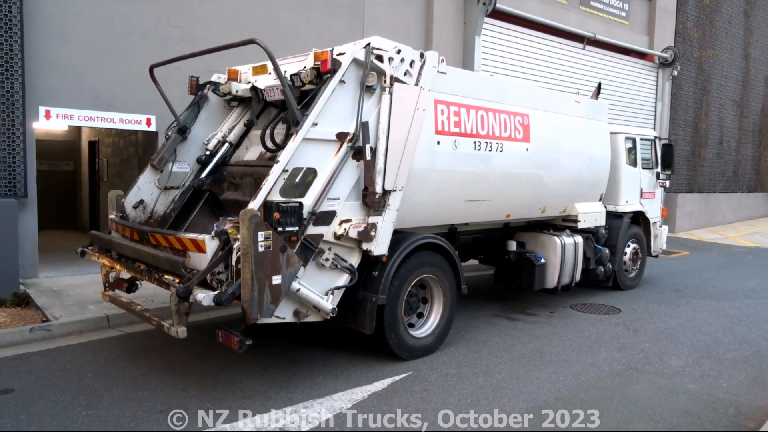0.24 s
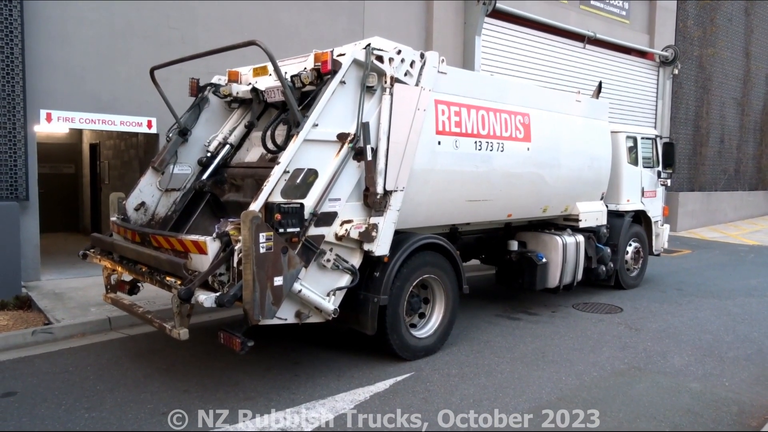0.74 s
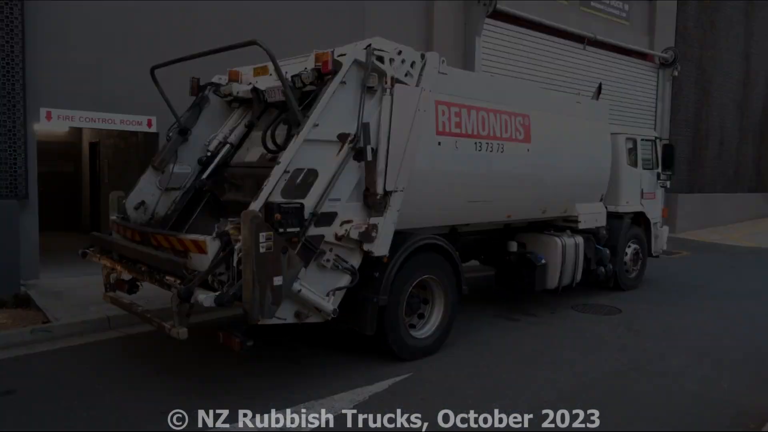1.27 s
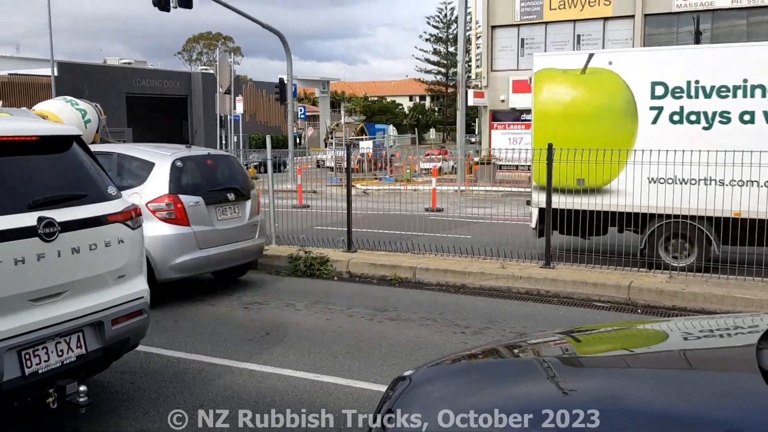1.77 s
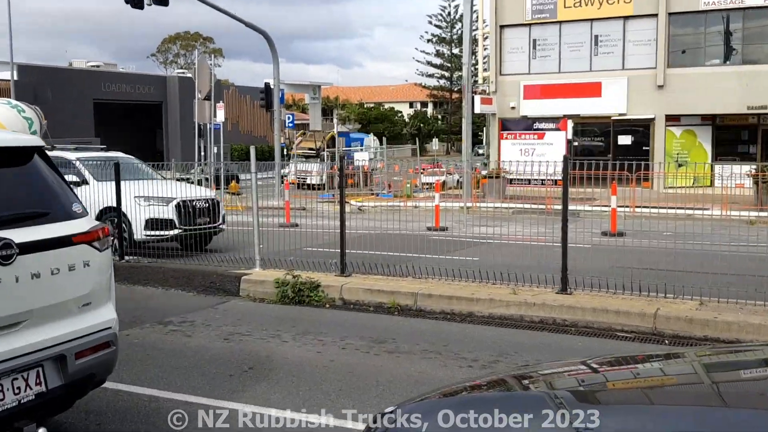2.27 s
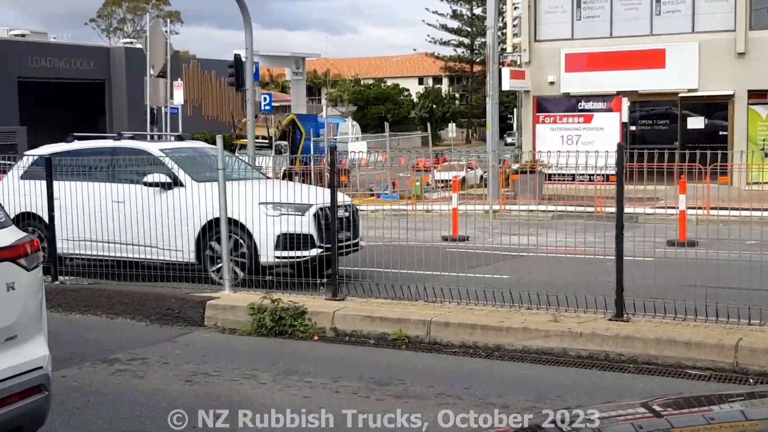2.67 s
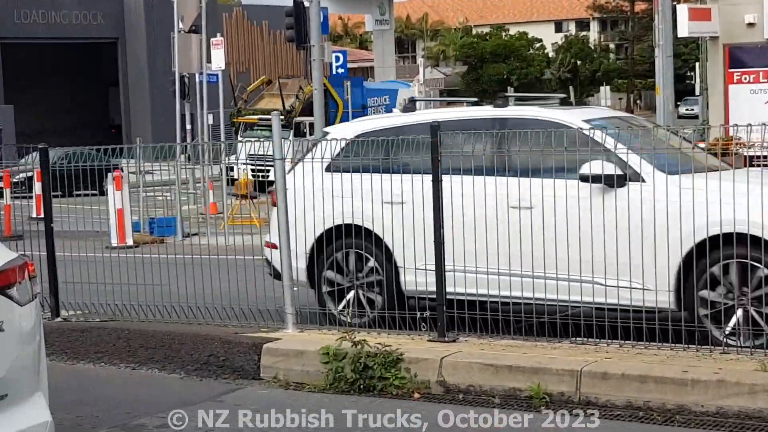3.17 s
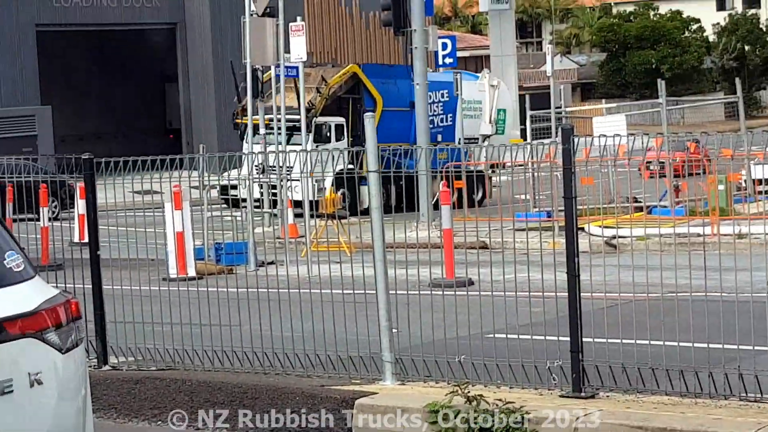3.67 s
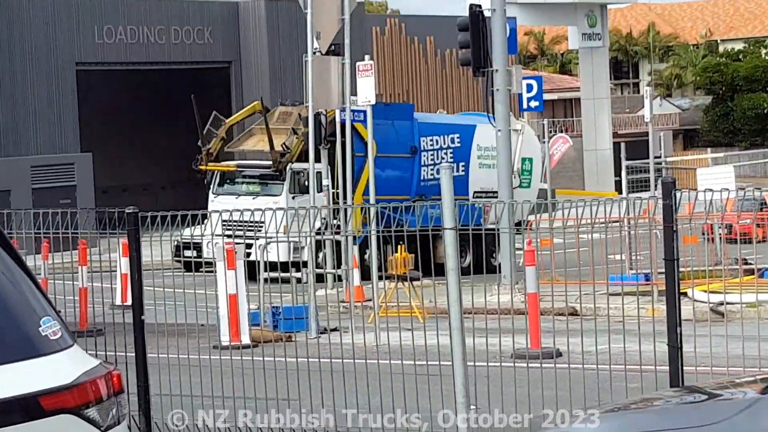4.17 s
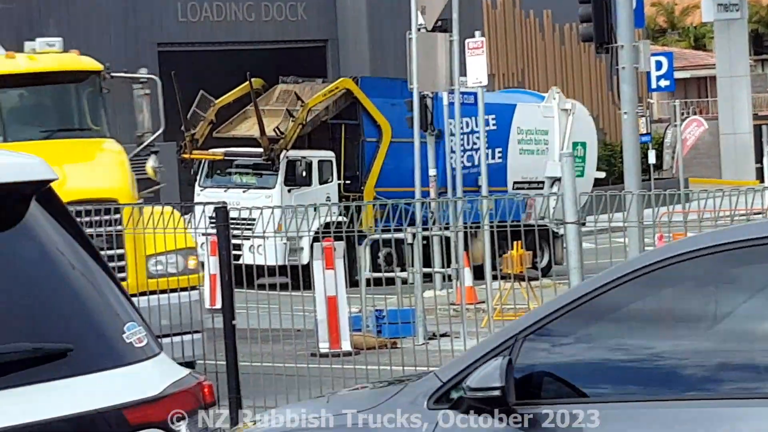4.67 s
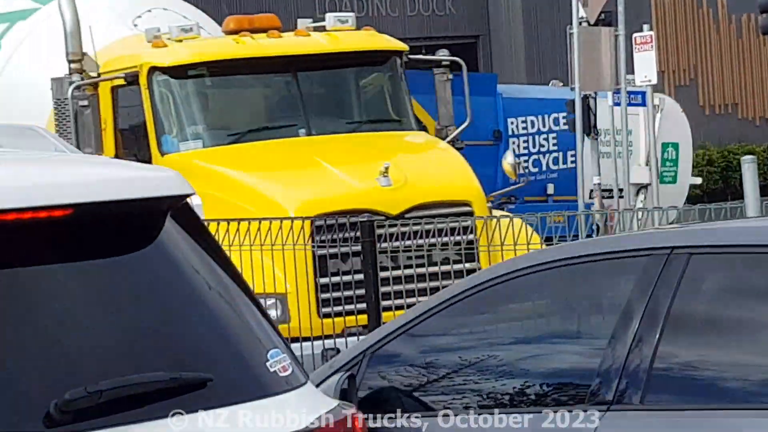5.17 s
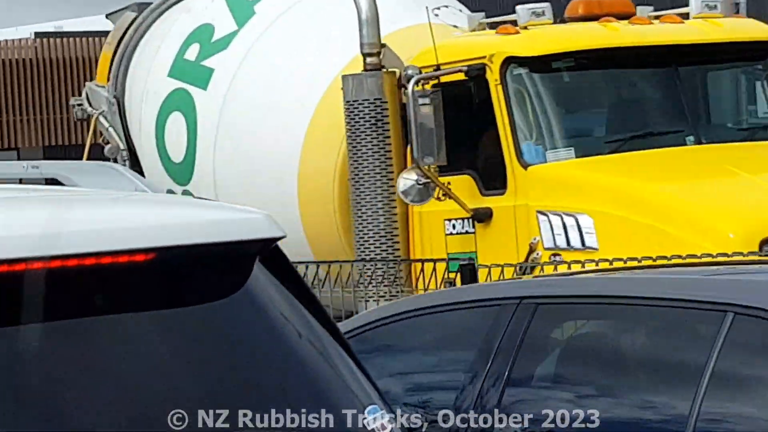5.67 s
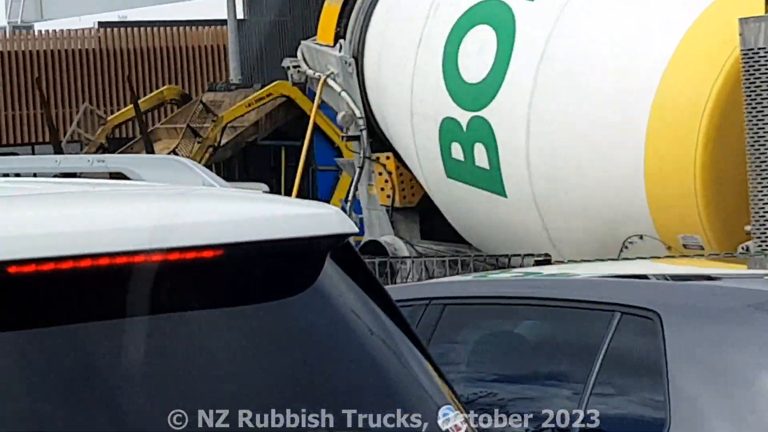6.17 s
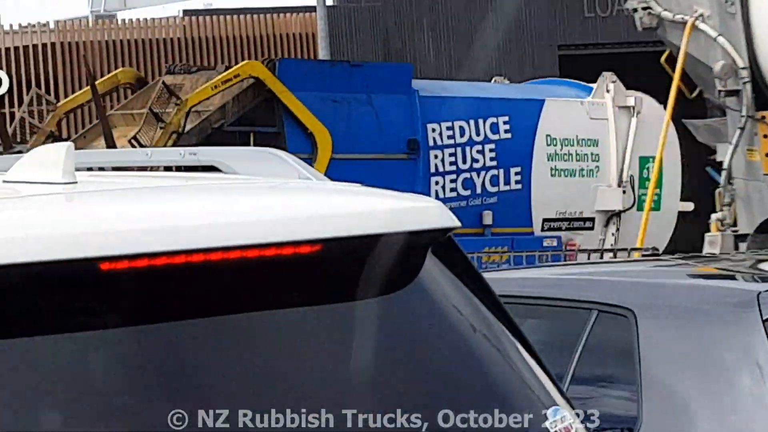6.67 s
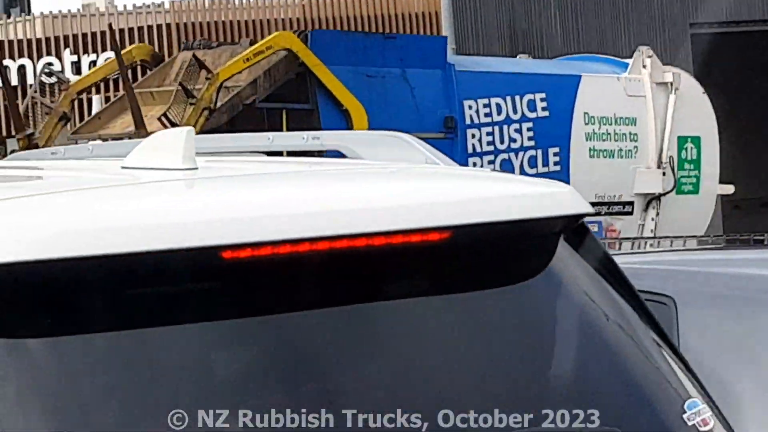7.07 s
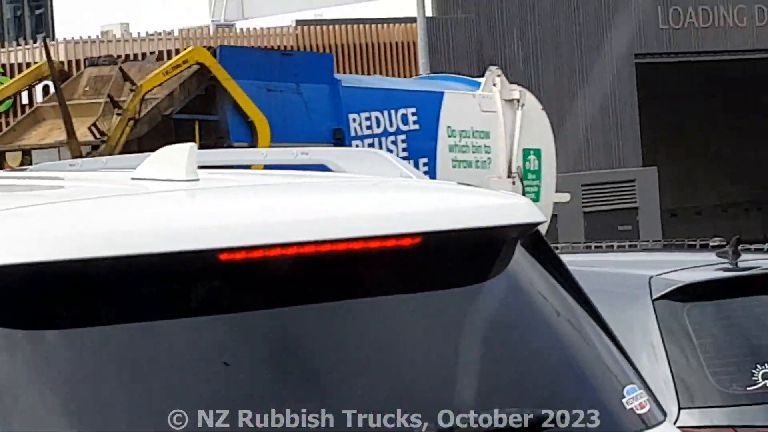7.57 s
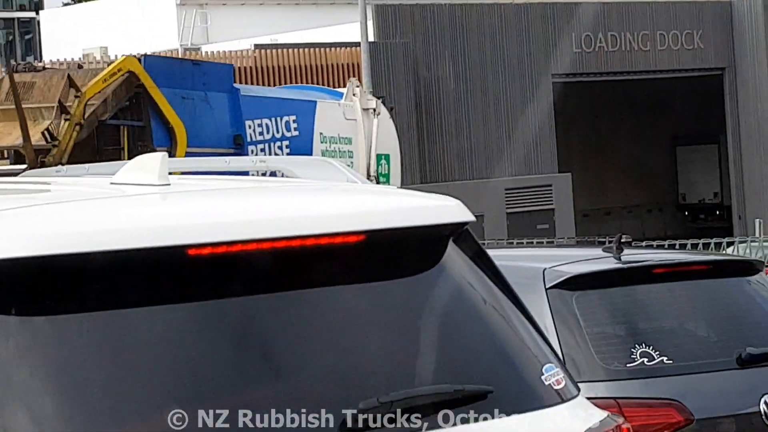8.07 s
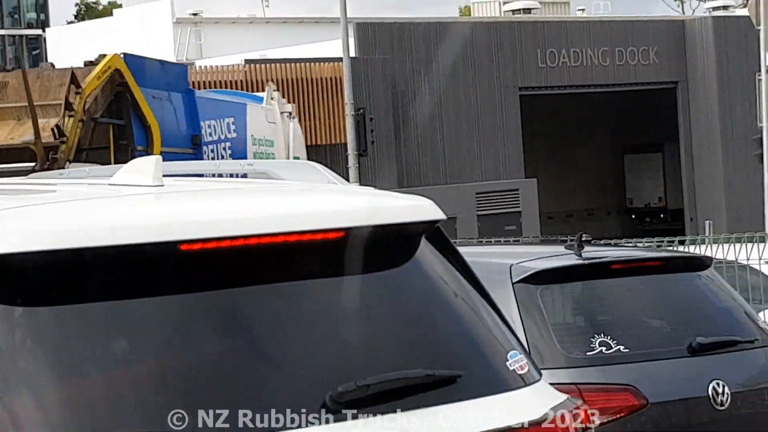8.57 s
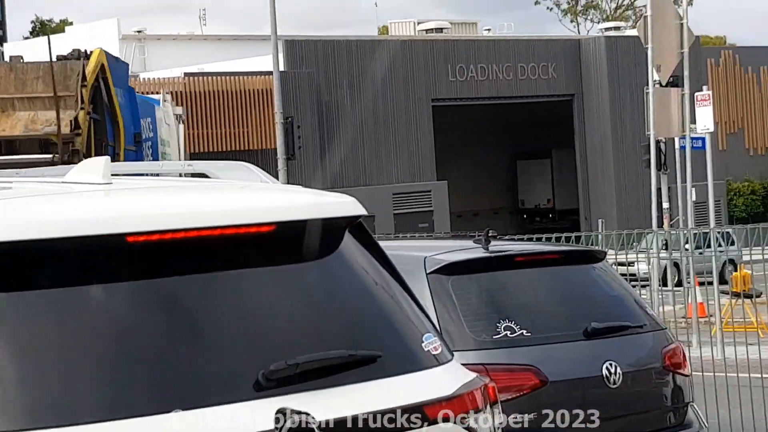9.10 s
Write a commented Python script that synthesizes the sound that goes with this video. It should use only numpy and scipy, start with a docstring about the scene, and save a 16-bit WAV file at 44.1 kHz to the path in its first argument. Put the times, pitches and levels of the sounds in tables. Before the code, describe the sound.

Diesel clatter and hydraulic whine stop abruptly, giving way to traffic rumble and vent air inside a car as a truck accelerates past.

```python
"""A garbage truck stands close by, its diesel clattering under the whine of its hydraulic drive.
It breaks off, and we sit in a car idling in traffic, air rushing through the vents.
Engines throb at rest over the road rumble. A heavy truck pulls past outside, its exhaust booming
through the doors as it gathers speed, changes up and pulls on."""
import sys
import numpy as np
from scipy import signal
from scipy.fft import rfft, irfft, next_fast_len
from scipy.io import wavfile

SR = 44100
rng = np.random.default_rng(int(sys.argv[2]) if len(sys.argv) > 2 else 0)


def unload_audio(sound):
    """Save the sound as a 16-bit wav file, at the path given as the first command line argument."""
    columns = np.transpose(np.atleast_2d(sound))
    # keep every value between -1 and 1, then stretch to whole-number steps
    steps = np.round(np.clip(columns, -1, 1) * 32767)
    wavfile.write(sys.argv[1], SR, steps.astype(np.int16))


N = 411894
TIME, HZ = np.arange(N) / SR, np.fft.rfftfreq(N, 1 / SR)
IDLE_HZ = 21.55  # the car's four-cylinder firing rate
CABIN_SIDE_DB = 8  # left over right
# Sound field in the cabin. Each row: frequency in Hz, left-right correlation.
CABIN_CORRELATION = [(60, 0.82), (130, 0.77), (290, 0.92), (640, 0.66), (900, 0.52), (1410, 0), (15000, 0)]


def amp(db):
    """Decibels to gain."""
    return 10 ** (np.asarray(db) / 20)


def unit(x):
    """Scales to rms 1."""
    return x / np.sqrt(np.mean(x ** 2) + 1e-20)


def over_hz(points):
    """Interpolates (Hz, value) rows on a log-frequency axis."""
    hz, value = np.transpose(points)
    return np.interp(np.log(HZ + 1), np.log(hz + 1), value)


def over_time(points):
    """Interpolates (s, value) rows per sample."""
    return np.interp(TIME, *np.transpose(points))


def pan(side_db):
    """Left and right gains for a level difference."""
    return amp(np.array([[.5], [-.5]]) * side_db)


def colour(x, gain):
    """Filters by a gain per frequency."""
    size = next_fast_len(N)
    bins_hz = np.fft.rfftfreq(size, 1 / SR)
    gain = np.array([np.interp(bins_hz, HZ, g) for g in np.atleast_2d(gain)])
    return irfft(rfft(x, size) * gain, size)[:, :N]


def drift(cutoff_hz):
    """Random wander, rms about 1."""
    smoothing = signal.butter(2, cutoff_hz, fs=500, output="sos")
    knots = signal.sosfilt(smoothing, rng.standard_normal(8000))
    return np.interp(TIME * 500, np.arange(6000), unit(knots[2000:]))


def noise(gain, correlation):
    """Stereo noise of rms 1 with a given spectrum and left-right correlation."""
    a, b = rng.standard_normal((2, N))
    alike = over_hz(correlation)
    mid = np.sqrt((1 + alike) / 2)
    side = np.sqrt((1 - alike) / 2) * np.array([[1], [-1]])
    return unit(colour(a, gain * mid) + colour(b, gain * side))


def resonances(modes):
    """Gain curve of steep-sided peaks, each with power set by its level."""
    peaks = (amp(db) ** 2 / width / (1 + ((HZ - hz) / width * 2) ** 2) ** 2 for hz, width, db in modes)
    return np.sqrt(sum(peaks))


def tone(hz):
    """Sine of rms 1 at a steady or moving pitch."""
    cycles = np.cumsum(np.broadcast_to(hz, N)) / SR
    return np.sqrt(2) * np.sin(2 * np.pi * (cycles + rng.random()))


def low_pass(x, edge_hz):
    """Steep band limit."""
    taps = signal.firwin(801, edge_hz, window=("kaiser", 9), fs=SR)
    return signal.oaconvolve(x, taps[None], "same", axes=1)


def echoes(x, earliest_s, latest_s, echo_db, count=10):
    """Nearby surfaces return echoes that comb the noise."""
    delays_s = rng.uniform(earliest_s, latest_s, count)
    returned = sum(np.roll(x, round(s * SR), axis=1) for s in delays_s) / np.sqrt(count)
    return (x + amp(echo_db) * returned) / np.hypot(1, amp(echo_db))


def diesel(firing_hz=40.45, knock_db=0.26, rattle_db=0.87):
    """Firings and valve gear shake the block and ring the panels; oil and air hiss."""
    # Clatter and hiss spectra. Each row: frequency in Hz, relative density in dB.
    clatter_spectrum = [(30, -34), (70, -21.5), (150, -10), (300, -3.5), (500, 2.5), (760, -1.5),
                        (1000, -1.5), (1430, 0.5), (1650, -4), (2400, -0.5), (3050, -6.5), (3250, -10.5),
                        (3950, -9.5), (4200, -31)]
    hiss_spectrum = [(2000, -17), (4100, 1.5), (6000, 3), (6900, -1.5), (8400, -2.5), (9600, 1.5),
                     (10900, 4)]
    # Panels and pipes. Each row: frequency in Hz, width in Hz, relative level in dB.
    panel_modes = [(853, 60, -35), (1110, 110, -41), (1250, 70, -42), (1410, 150, -37.5), (1840, 55, -41),
                   (2050, 60, -46), (2200, 130, -43), (2480, 110, -36.5), (2622, 40, -37.5),
                   (3005, 75, -40), (3125, 50, -47), (3940, 150, -48), (4795, 120, -53.5), (7250, 250, -62)]
    # Sound field by the truck. Each row: frequency in Hz, left-right correlation.
    correlation = [(60, 0.99), (640, 0.99), (1410, .88), (3100, 0.9), (6820, 0.72), (11000, 0.89)]
    phase = 2 * np.pi * np.cumsum(firing_hz * (1 + 0.0037 * drift(3))) / SR
    knock = 0.35 * np.cos(phase / 2) + 0.66 * np.cos(phase) + np.cos(2 * phase) + 0.7 * np.cos(3 * phase)
    shake = amp(knock_db * unit(knock) + rattle_db * drift(58))
    block = amp(-23.5) * noise(amp(over_hz(clatter_spectrum)) / (1 + (HZ / 5000) ** 8), correlation)
    panels = amp(-26) * noise(resonances(panel_modes), correlation)
    hiss = amp(-39) * noise(amp(over_hz(hiss_spectrum)) / (1 + (HZ / 12500) ** 30), correlation)
    return (block + panels + hiss) * unit(shake)


def pump(gain_db=-1, waver=0.00075, scatter_hz=2.36, flutter_db=2.2):
    """Gear tones share one wavering shaft speed; each flutters with the load on its teeth."""
    # Pump and gear whine. Each row: frequency in Hz, relative level in dB.
    partials = [(484.5, -38.5), (576.5, -40), (605.5, -43), (715, -41), (850.6, -35), (1547, -54),
                (1832.5, -38), (2154, -36.5), (2279, -34), (2400, -42), (2524.6, -37), (2619, -40.5),
                (3003, -44), (3386, -50), (3585, -54), (3710, -46.5), (3925, -52), (4775, -51.5),
                (5545, -57.5)]
    speed = 1 + waver * drift(4.2)
    whine = 0
    for hz, db in partials:
        partial = amp(db) * tone(hz * speed + scatter_hz * drift(23.3))
        whine += partial * unit(amp(flutter_db * drift(12)))
    return amp(gain_db) * whine


def garbage_truck():
    """The diesel echoes in a walled lane under the pump's whine."""
    # Stereo balance. Each row: frequency in Hz, left over right in dB.
    balance = [(100, -0.5), (400, 1.5), (700, 1), (1290, 2.5), (2380, -2), (4400, -3), (8120, -2),
               (11000, -1.5)]
    lane = echoes(diesel(), .006, .07, echo_db=-11.5) + pump()
    return low_pass(colour(lane, pan(over_hz(balance))), edge_hz=11050)


def idling():
    """The car and the engines around it, a little apart in speed, beat against each other."""
    # The car's idle: levels in dB of harmonics 1 and 2.
    harmonics_db = [-42, -43.5]
    # Hum of waiting engines. Each row: frequency in Hz, level in dB.
    hums = [(36.3, -46.5), (40.5, -38.5), (123.5, -48), (162.7, -47)]
    own_hz = IDLE_HZ + 0.054 * drift(0.25)
    own = sum(amp(db) * tone(k * own_hz) for k, db in enumerate(harmonics_db, 1))
    others = sum(amp(db) * tone(hz + 0.118 * (hz / 40) ** 2 * drift(3.1)) for hz, db in hums)
    return own + others


def oncoming(nearest_s=2.07, half_width_s=0.63):
    """Nearness of the oncoming traffic, 0-1."""
    return 1 / (1 + ((TIME - nearest_s) / half_width_s) ** 4)


def rumble(level_db=-33, oncoming_db=1.5, lumpy_db=0.74, throb_db=0.43):
    """Lumpy road rumble rises with the oncoming traffic and throbs with the idle."""
    # Traffic through closed doors. Each row: frequency in Hz, relative density in dB.
    spectrum = [(18, -23), (30, -12), (52, -9), (62, 0.5), (80, 3.5), (105, -1.5), (150, 0), (190, -2.5),
                (235, -4), (280, -13), (360, -9), (460, -15.5), (580, -24.5), (900, -44)]
    gain = amp(over_hz(spectrum)) / (1 + (HZ / 1500) ** 2)
    road = noise(gain * pan(CABIN_SIDE_DB), CABIN_CORRELATION)
    return road * amp(level_db + oncoming_db * oncoming() + lumpy_db * drift(9) + throb_db * tone(IDLE_HZ))


def airflow(spectrum, modes, rush_db, fizz_db):
    """Air rushes through the ducts, rings them and fizzes at the grille."""
    # Stereo balance. Each row: frequency in Hz, left over right in dB.
    balance = [(60, 5), (400, 17.5), (780, 5), (1080, 9), (1320, 13.5), (1620, 7.5), (2400, 10.5),
               (4200, 8.5), (6400, 12), (7700, 11.5), (10000, 21), (12800, 10), (15000, 17)]
    sides = pan(over_hz(balance))
    gain = amp(over_hz(spectrum)) * sides
    low_share = 1 / (1 + (HZ / 7600) ** 16)
    rush = noise(gain * np.sqrt(low_share), CABIN_CORRELATION) * amp(rush_db)
    fizz = noise(gain * np.sqrt(1 - low_share), CABIN_CORRELATION) * amp(fizz_db)
    ring_rms = np.linalg.norm(amp([db for _, _, db in modes]))
    ring = noise(resonances(modes) * sides, CABIN_CORRELATION) * ring_rms
    return rush + fizz + ring


def vents(oncoming_db=2, flicker_db=0.37, throb_db=0.22):
    """The rush changes colour as the microphone turns, swells with traffic and shivers with the idle."""
    # Vent rush, facing ahead and turned. Each row: frequency in Hz, relative density in dB.
    ahead_spectrum = [(300, -20), (610, -14), (760, 4), (1080, -2.5), (1300, -7.5), (1750, -3.5),
                      (1900, -7), (2300, -7), (3100, -10.5), (6300, -18.5), (7700, -26), (10000, -20),
                      (12500, -23.5), (15600, -37)]
    turned_spectrum = [(300, -5), (610, -10.5), (760, 3.5), (1080, -1.5), (1300, -4.5), (1560, -1.5),
                       (1700, -5), (2400, -9.5), (3100, -10), (6300, -15.5), (7600, -29.5), (10000, -21),
                       (12500, -27), (15600, -43)]
    # Duct and cabin resonances. Each row: frequency in Hz, width in Hz, level in dB.
    ahead_modes = [(787, 110, -51), (876, 69, -53), (1450, 180, -53.5), (1695, 66, -58), (3670, 120, -68)]
    turned_modes = [(1085, 110, -55), (1488, 126, -51), (2430, 120, -59), (3130, 90, -69),
                    (3260, 110, -65.5), (3780, 200, -63), (4560, 150, -64.5), (4800, 90, -66),
                    (6180, 160, -70)]
    # Swings from windscreen to side window. Each row: start in seconds, length in seconds, share of turn.
    swings = [(2.398, 1, 0.4), (5.0, .8, .5)]
    turn = sum(share * np.clip((TIME - s) / length_s, 0, 1) for s, length_s, share in swings)
    ahead = airflow(ahead_spectrum, ahead_modes, rush_db=-45, fizz_db=-57)
    turned = airflow(turned_spectrum, turned_modes, rush_db=-42.5, fizz_db=-58.5)
    ahead, turned = (echoes(air, .003, .02, echo_db=-13) for air in (ahead, turned))
    rush = np.sqrt(1 - turn) * ahead + np.sqrt(turn) * turned
    shiver = amp(flicker_db * drift(30) + throb_db * tone(IDLE_HZ))
    return rush * shiver * amp(oncoming_db * oncoming())


def gear_change_hz(governed_hz=96.2, clutch_s=6.46, sag_s=.38, slack_hz=52):
    """Firing rate climbs towards the governed speed; clutch out, it sags until the next gear bites."""
    # One pull per gear. Each row: start in seconds, starting rate in Hz, time constant in seconds.
    pulls = [(2.1, 64.94, 2.7), (7.05, 59.8, 4.7)]

    def approach(start_s, from_hz, to_hz, lag_s):
        return to_hz + (from_hz - to_hz) * np.exp(-np.maximum(TIME - start_s, 0) / lag_s)

    first, second = (approach(s, hz, governed_hz, lag_s) for s, hz, lag_s in pulls)
    sagging = approach(clutch_s, np.interp(clutch_s, TIME, first), slack_hz, sag_s)
    return np.where(TIME < clutch_s, first, np.maximum(sagging, second))


def passing_truck(node_s=3.44, node_gap_s=1.3, reflection=.55):
    """Two exhaust harmonics get through the doors; the boom crosses standing waves in the street."""
    # Exhaust harmonics 1 and 2. Each row: time in seconds, relative level in dB.
    boom_levels = [(1.47, -42), (2.44, -43), (2.58, -27.5), (3.2, -26), (4.0, -29), (4.7, -34),
                   (5.4, -27.3), (6.65, -27.5), (7.1, -31.5), (8.0, -37), (9.33, -36)]
    overtone_levels = [(1.47, -36), (2.22, -42), (2.34, -33), (3.17, -35.5), (3.29, -43.5), (3.99, -43.5),
                       (4.26, -29), (4.43, -43), (5.07, -34.5), (5.25, -47.5), (6.79, -42.5), (6.91, -29.5),
                       (7.48, -35.0), (7.6, -48), (9.33, -46)]
    firing_hz = gear_change_hz() * (1 + .003 * drift(10))
    standing_wave = abs(1 - reflection * np.exp(2j * np.pi * (TIME - node_s) / node_gap_s))
    boom = amp(over_time(boom_levels) - 2) * standing_wave * tone(firing_hz)
    overtone_db = over_time(overtone_levels) - 0.04 + 1.4 * drift(9.1)
    return boom + amp(overtone_db) * tone(2 * firing_hz)


def squeak(peak_s=8.28, half_width_s=.008, pitch_hz=9050, level_db=-59):
    """One tiny high squeak."""
    envelope = np.exp(-((TIME - peak_s) / half_width_s) ** 2)
    return amp(level_db) * envelope * tone(pitch_hz) * pan(CABIN_SIDE_DB)


def ticks(decay_s=.0016, side_db=10):
    """Short dying bursts in the modes of a plastic part."""
    # Ticks in the cabin. Each row: start in seconds, level in dB.
    blows = [(9.1257, -34), (9.1282, -43)]
    # Plastic modes. Each row: frequency in Hz, width in Hz, relative level in dB.
    modes = [(3600, 1300, 0), (5400, 1200, -4), (10300, 1800, 0), (12000, 2000, -6)]
    envelope = sum(amp(db) * (TIME >= s) * np.exp(-abs(TIME - s) / decay_s) for s, db in blows)
    return envelope * noise(resonances(modes) * pan(side_db), CABIN_CORRELATION)


def scene(truck_end_s=1.422, fade_out_s=0.022, car_start_s=1.463, fade_in_s=0.0037):
    """The garbage truck, a blink of silence, then the street from inside the car."""
    truck = garbage_truck() * np.clip((truck_end_s - TIME) / fade_out_s, 0, 1)
    engines = (idling() + passing_truck()) * pan(CABIN_SIDE_DB)
    cabin = engines + rumble() + vents() + ticks() + squeak()
    return truck + cabin * np.clip((TIME - car_start_s) / fade_in_s, 0, 1)


def record(dry):
    """The recorder's band limit."""
    return low_pass(dry, edge_hz=15700)


dry = scene()
out = record(dry)
unload_audio(out)
```